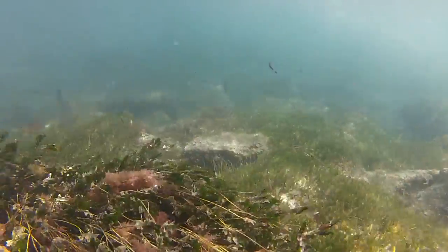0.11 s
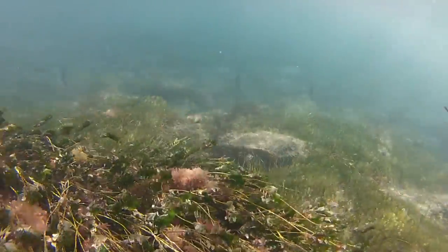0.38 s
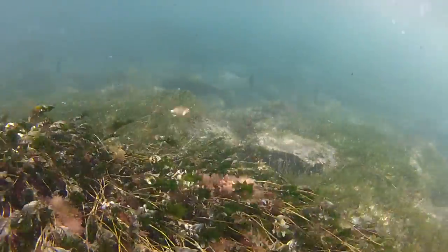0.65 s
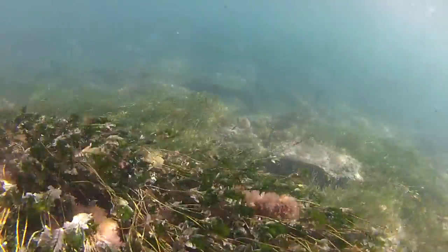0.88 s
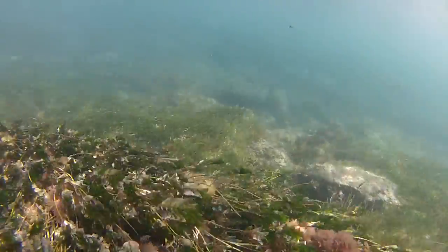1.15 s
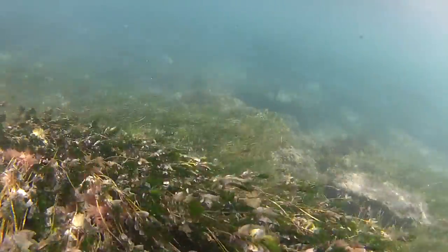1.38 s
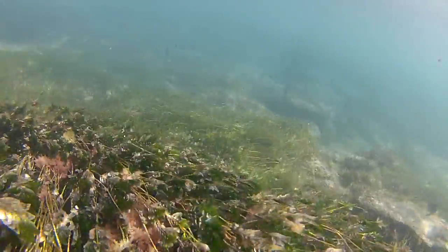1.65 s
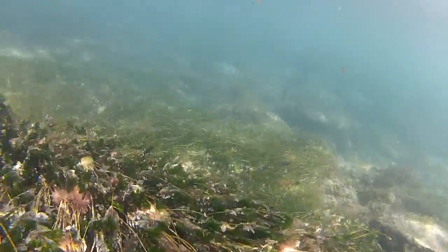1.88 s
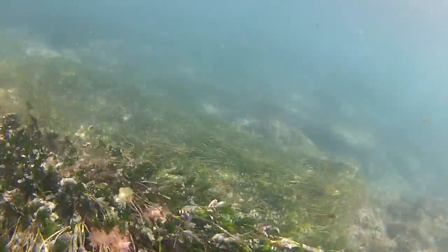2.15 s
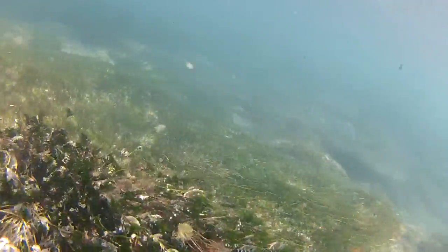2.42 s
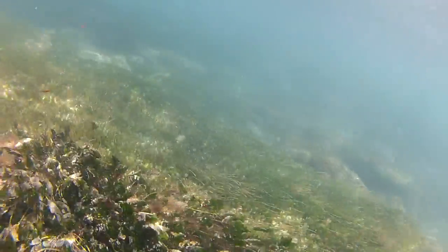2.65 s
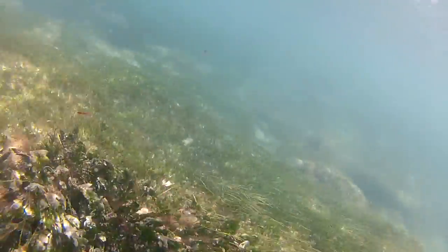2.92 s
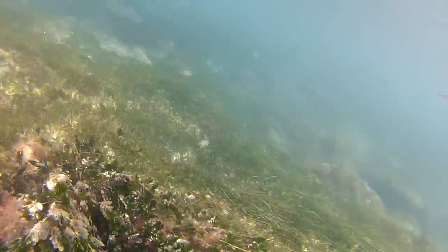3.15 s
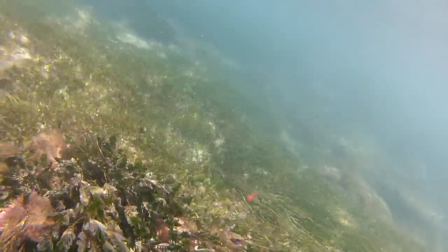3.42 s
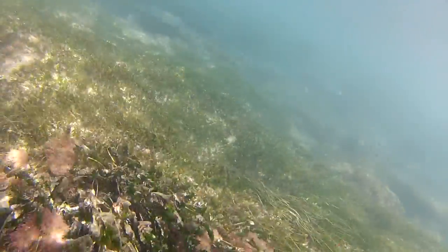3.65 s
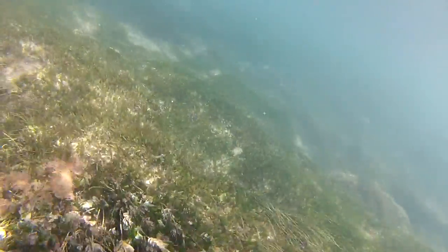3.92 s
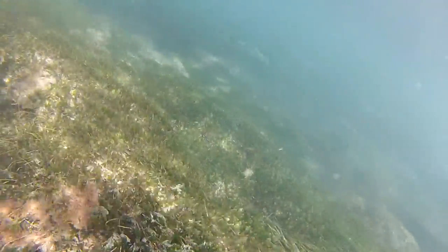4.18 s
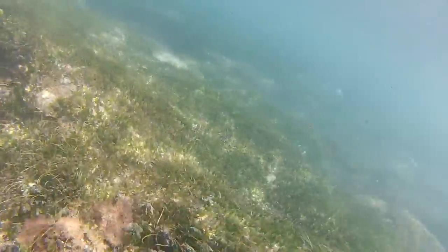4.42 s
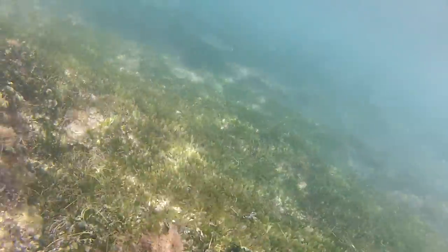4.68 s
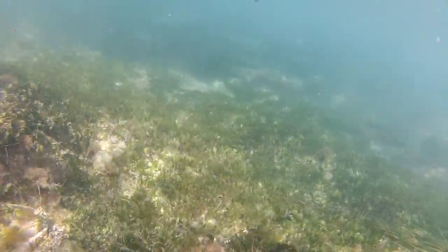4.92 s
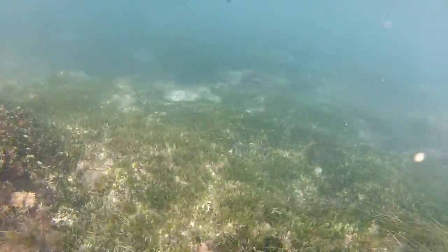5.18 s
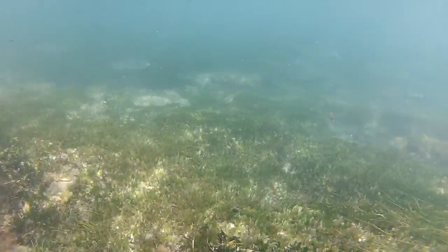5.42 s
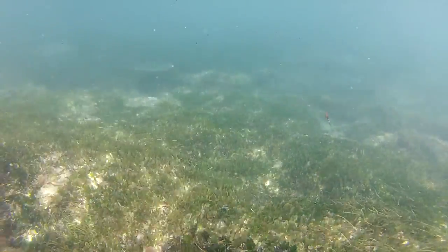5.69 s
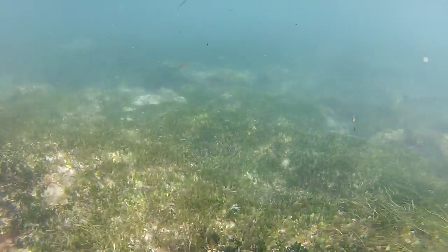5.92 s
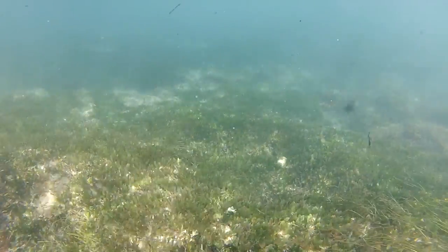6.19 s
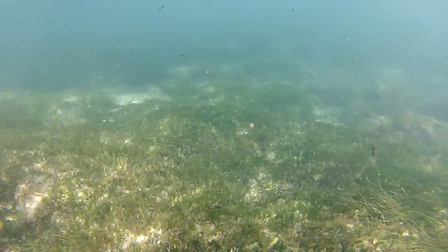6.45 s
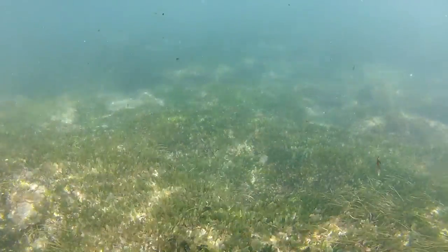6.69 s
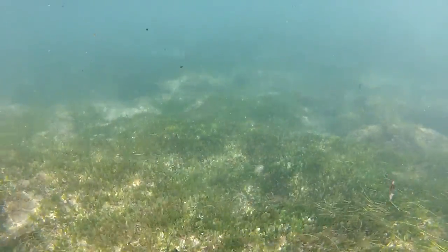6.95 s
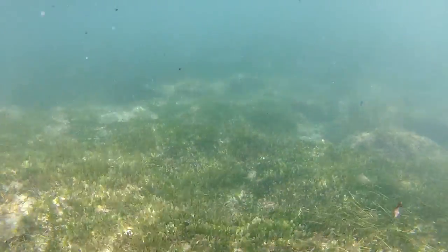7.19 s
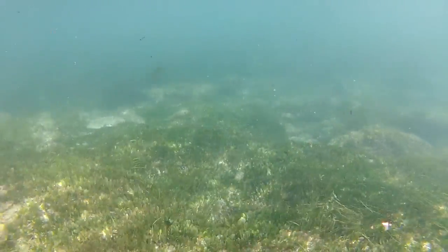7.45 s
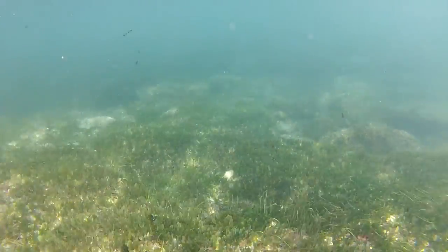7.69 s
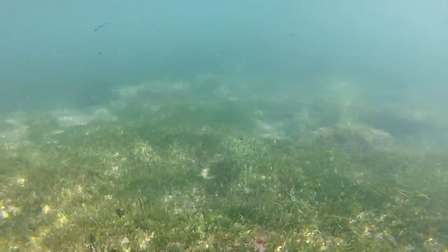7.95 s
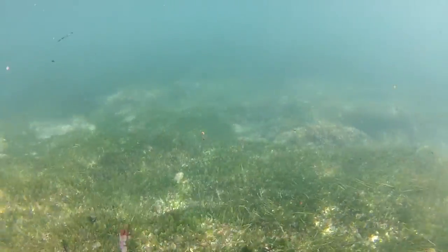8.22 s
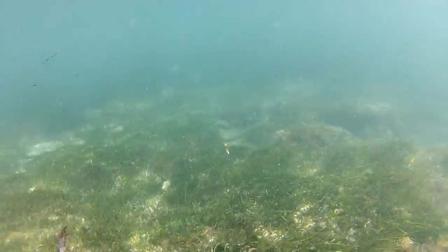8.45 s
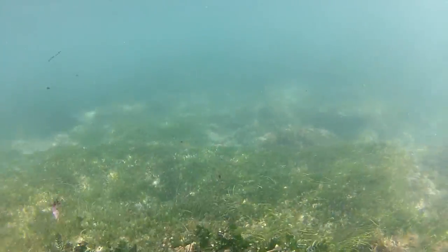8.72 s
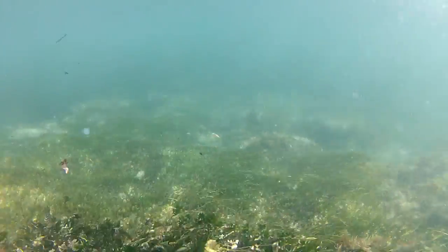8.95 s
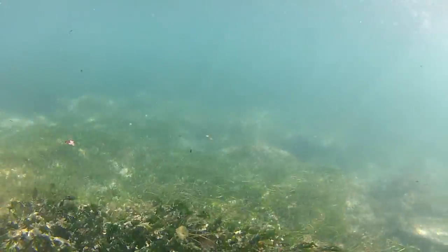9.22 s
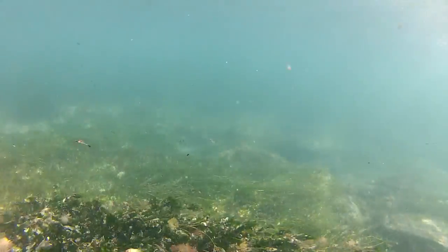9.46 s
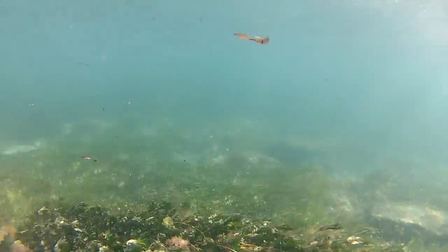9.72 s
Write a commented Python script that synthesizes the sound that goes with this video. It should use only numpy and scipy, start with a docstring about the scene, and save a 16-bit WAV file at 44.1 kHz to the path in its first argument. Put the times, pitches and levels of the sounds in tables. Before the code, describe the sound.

Under water, a loose plastic cover knocks and scrapes irregularly on a hollow camera housing, over low muffled water rumble and faint hiss.

```python
"""Knocks of a loose lens cover on a lanyard, under water, ring the damped modes of a plastic camera housing.
The cover also drags: random stick and slip drives the same modes, with squeaks, ticks and light bounces.
Behind it the water surges low, as slow-varying filtered noise, with a faint steady hiss.
The sealed-in microphone is sampled slowly and each value is held, which mirrors the sound into the treble."""
import sys
import numpy as np
from scipy import signal
from scipy.fft import rfft, irfft, next_fast_len
from scipy.io import wavfile
from scipy.ndimage import uniform_filter1d

SR = 44100
rng = np.random.default_rng(int(sys.argv[2]) if len(sys.argv) > 2 else 0)


def generate_wav(sig):
    """Save sig (samples, or channels by samples) to the path in sys.argv[1] as 16-bit PCM at SR."""
    pcm = np.round(np.clip(np.atleast_2d(sig).T, -1, 1) * 32767).astype(np.int16)
    wavfile.write(sys.argv[1], SR, pcm)


def gain_from_db(level_db):
    """Convert decibel levels to linear amplitude factors (20 dB per decade)."""
    decades = np.asarray(level_db, float) / 20
    return 10 ** decades


N = 434385

# water pushing the housing: start_s, level_db (rms of the rumble)
WATER_SURGE = [(0, -31.5), (1.12, -29.5), (1.302, -44.5), (1.85, -33), (2.199, -43.5), (4.399, -47.5),
               (5.698, -44), (6.101, -49.5), (9.85, -42)]
# spectral shape of the hiss: frequency_hz, relative_level_db
HISS_SHAPE = [(60, -12.5), (280, -12), (900, -28.5), (1900, -33.5), (5500, -41)]
# housing modes, nominal values for the damped ring of an ordinary blow: frequency_hz, relative_level_db, t60_s
LOW_MODES = [(61.5, -15.5, 0.073), (91, -5.5, 0.093), (147.3, -1, 0.085), (185.8, -0.5, 0.16),
             (283, 0, 0.038)]
MIDDLE_MODES = [(364.8, -2, 0.059), (425.4, -0.5, 0.042), (510.3, 5, 0.042), (657, 0, 0.069),
                (725.5, -0.5, 0.068), (830, -1, 0.049)]
HIGH_MODES = [(1070, 10, 0.026), (1403, 3, 0.033), (1774, 9, 0.016), (1982, 5.5, 0.023), (2253, -3, 0.043),
              (2446, -3, 0.02), (2800, -14, 0.016), (3020, -14, 0.021), (3460, -9, 0.022),
              (3625, -17.5, 0.042), (3770, -22.5, 0.013), (4750, -28, 0.028)]
# light bounces of the cover: start_s, peak_db
LIGHT_BOUNCES = [(5.41, -48), (6.38, -56), (6.451, -55), (8.741, -39)]
# clearest squeaks: centre_s, peak_db, pitch_hz
CLEAR_SQUEAKS = [(2.811, -41, 2160), (3.099, -42, 2060), (4.41, -51, 3570), (4.462, -44, 2020)]
# scrapes along the housing, before the mid-stroke push: start_s, end_s, start_level_db, end_level_db
DRAG_STROKES = [(0, 0.22, -38, -33.5), (0.303, 0.431, -27, -25.5), (0.543, 0.603, -33, -34),
                (0.758, 0.926, -34.5, -28.5), (1.468, 1.66, -42, -28.5), (1.64, 1.826, -27.5, -21.5),
                (1.863, 1.939, -15, -22), (2.057, 2.36, -41.5, -35), (2.372, 2.474, -21.5, -40),
                (2.48, 2.605, -38.5, -36.5), (2.61, 2.74, -26, -26), (2.841, 2.941, -24.5, -17.5),
                (2.995, 3.11, -25.5, -41.5), (3.195, 3.348, -47, -26.5), (3.451, 3.495, -31.5, -38),
                (3.543, 3.63, -24.5, -26), (3.638, 3.758, -19.5, -27), (3.957, 4.15, -31.5, -41),
                (4.161, 4.336, -27, -44.5), (4.322, 4.516, -50, -50), (4.521, 4.584, -38.5, -42),
                (4.654, 4.75, -34, -29), (4.774, 4.93, -22.5, -22), (5.594, 5.75, -33.5, -37),
                (5.74, 5.812, -28.5, -21.5), (5.963, 6.19, -40, -40), (6.123, 6.39, -37.5, -50.5),
                (6.408, 6.588, -49, -57), (7.26, 7.3, -28, -43), (7.32, 7.4, -20.5, -34.5),
                (7.46, 7.603, -32, -45.5), (7.577, 7.8, -51, -41.5), (7.842, 7.979, -39, -41.5),
                (8.729, 8.981, -39, -57), (9.105, 9.2, -54.5, -61.5), (9.41, 9.505, -33.5, -38.5),
                (9.599, 9.83, -36, -35.5)]
# how the cover bears on the housing:
# time_s, low_mode_weight_db, high_mode_hardness_db, spot_pitch_hz (favoured by the contact spot)
CONTACT_PATH = [(0.16, 7.5, -9, 500), (0.24, -3.5, -26, 460), (0.568, 9, -22.5, 430),
                (1.631, -10.5, -18, 452), (1.8, -5, -17, 640), (1.9, -4.5, -26, 644),
                (2.339, 1, -11.5, 550), (2.39, 0.5, -17.5, 674), (2.6, -12.5, -19, 593),
                (2.75, -5, -21, 583), (3.05, -5, -17.5, 577), (3.701, -4, -17, 573), (4.25, 1, -18, 550),
                (4.45, -12, -6.5, 550), (4.897, -3, -21.5, 571), (5.549, -5.5, -12.5, 500),
                (5.81, 4.5, -15, 520), (6.17, 5.5, -8, 630), (6.33, 1.5, -11.5, 643), (7.3, 8, -16, 483),
                (7.509, 2, -13, 587), (9.85, -2.5, -10.5, 513)]
# knocks: start_s, middle_mode_peak_db, low_mode_weight_db, high_mode_hardness_db, spot_pitch_hz
COVER_KNOCKS = [(0.045, -1, -3, -4.5, 430), (0.191, -6.5, -5, -3, 447), (0.235, -17.5, 1.5, -14, 470),
                (0.277, -15, -3, -13, 450), (0.291, -20, 3, -4.5, 455), (0.324, -31, 5, -3, 448),
                (0.362, -12.5, -1.5, -4, 460), (0.384, -19, 6, -13, 450), (0.406, -26.5, -12, 0, 440),
                (0.481, -24.5, 4, -12.5, 570), (0.514, -20.5, -1, -18, 430), (0.541, -22, -18, -4.5, 456),
                (0.567, -16, -23, -12.5, 460), (0.579, -19.5, 8, -6, 407), (0.716, -23, 2.5, -21, 441),
                (0.779, -19.5, 0, -18, 427), (0.818, -10, -4, -17, 520), (0.871, -13.5, -7.5, -16, 455),
                (0.96, -19, -2, -15.5, 445), (1.024, -17.5, 2.5, -23, 445), (1.066, -18, 1.5, -16.5, 467),
                (1.674, -15, -12.5, -8, 463), (1.806, -4, -22.5, 3.5, 535),
                (1.841, -14.5, -11.5, -5.5, 520), (1.87, -7.5, -13, -4.5, 710), (2.372, -12, -34, -37, 593),
                (2.734, -6, -12, -1.5, 660), (2.829, -17.5, -18.5, -17, 570), (2.856, -3, -17, -7, 522),
                (2.881, -9.5, -36.5, -4, 530), (3.445, -10.5, -8, -13, 474), (3.541, -5.5, -7, 0, 796),
                (3.574, -11, -14.5, -6, 520), (4.171, -11, -8, -13, 506), (4.784, -3, -29, -8, 538),
                (4.84, -6, -11, -9.5, 534), (5.026, -46.5, -7.5, 17.5, 594), (5.238, -10, 2.5, -13, 503),
                (5.337, -10, -2, -13, 506), (5.353, -17, -10.5, -10.5, 523), (5.508, -15.5, -5, -12.5, 506),
                (5.553, -14.5, -9, -12, 505), (5.571, -17, -12, -15.5, 510),
                (5.588, -16.5, -13.5, -13, 511), (5.61, -1, -12.5, -2, 720), (5.666, 3.5, -19, -6, 707),
                (5.746, -15, -4, -6, 503), (5.784, -15.5, -19, -3.5, 520), (5.802, -12.5, -3, 0, 533),
                (5.816, -11.5, -27, -1.5, 540), (6.417, -32.5, -33, -28, 590), (6.548, -31, -27, -48, 533),
                (6.585, -32.5, -9, -21, 536), (7.189, -10.5, -11.5, -11.5, 471),
                (7.259, -11, -34.5, -4, 506), (7.3, -13, 2, -9, 494), (7.317, -9, 5, -1.5, 342),
                (7.339, -14, 0.5, -5, 490), (7.358, -24.5, 20, -14.5, 504), (7.451, -23, 3.5, -17, 500),
                (7.959, -21.5, -15.5, -19.5, 529), (8.673, 5.5, -21, -2.5, 411),
                (8.721, -12, -21, -7.5, 424), (8.803, -17, -22, -8.5, 413), (9.457, -22.5, -25, 0, 650)]


def evened(x):
    """Normalization: scales a signal to rms 1."""
    return x / np.sqrt(np.mean(x ** 2) + 1e-20)


def add(mix, start_s, sound):
    """Superposition: adds a sound to the mix from its start time."""
    part = mix[round(start_s * SR):][:len(sound)]
    part += sound[:len(part)]


def coloured(gain):
    """Spectral shaping: white noise weighted by a gain over Hz, at rms 1."""
    size = next_fast_len(N)
    hz = np.fft.rfftfreq(size, 1 / SR)
    spectrum = rfft(rng.standard_normal(size)) * gain(hz + 1)  # +1 avoids the log of zero
    return evened(irfft(spectrum)[:N])


def water():
    """Broadband flow noise: a low rumble with a surging level over a faint steady hiss."""
    rumble = coloured(lambda hz: (hz / 14) ** 2 / (1 + (hz / 14) ** 2) / (1 + (hz / 35) ** 4.4))
    shape_hz, shape_db = np.transpose(HISS_SHAPE)
    hiss = coloured(lambda hz: gain_from_db(np.interp(np.log(hz), np.log(shape_hz), shape_db)))
    surge_db = np.interp(np.arange(N) / SR, *np.transpose(WATER_SURGE))
    return gain_from_db(surge_db) * rumble + gain_from_db(-56) * hiss


def near_db(hz, spot_hz, octaves=0.098, depth_db=13):
    """Point of drive: middle modes near the pitch of the contact spot are driven hardest."""
    return depth_db * np.exp(-.5 * (np.log2(hz / spot_hz) / octaves) ** 2)


def edge_db(hz, spot_hz):
    """Stiffness: low-pitched rim spots drive the modes above and below those of the flat faces."""
    octaves = np.log2(np.minimum(hz, 3600) / 2650)
    rim = np.log2(np.clip(520 / spot_hz, 1, 1.3))
    return np.maximum(90 * octaves, -22 * octaves) * rim


def struck(modes, t, chance, lean_db, length, scatter_db=3):
    """Impulse response: a blow sets off decaying modes, damped by the cover over a faint free ring; peak 1."""
    hz, db, t60 = np.transpose(modes)[:, :, None]
    count = len(modes)
    hz = hz * (1 + 0.015 * chance[-count:, None])  # the cover's load detunes each mode a little
    gain = gain_from_db(db + lean_db(hz) + scatter_db * chance[:count, None])
    # random polarity for each mode, so that the modes do not line up into one click
    gain = gain * np.sign(chance[::-1][:count, None])
    rise = (1 - np.exp(-t * hz / 0.41)) ** 2  # a mode needs about a cycle to build up
    damped = gain_from_db(-60 * t / (length * t60))
    free = gain_from_db(-27.5 - 60 * t / (2.1 * t60))
    ring = (gain * rise * (damped + free) * np.sin(2 * np.pi * hz * t)).sum(0)
    return ring / abs(ring).max()


def ticks():
    """Sparse random excitation: scattered faint ticks of grit on the housing briefly ring its modes."""
    t, modes = np.arange(SR // 20) / SR, MIDDLE_MODES[:3] + HIGH_MODES[2:]
    clicks = gain_from_db(2.5 * rng.exponential(1, N)) * (rng.random(N) < 26 / SR)  # about 26 a second
    chance = rng.standard_normal(len(MIDDLE_MODES + HIGH_MODES))
    tick = struck(modes, t, chance, lambda hz: 3 * np.log2(hz / 1000), 0.16)
    return gain_from_db(-57) * signal.oaconvolve(clicks, tick)[:N]


def bounces():
    """Selective excitation: light bounces ring only three of the upper modes."""
    t, out = np.arange(SR // 20) / SR, np.zeros(N)
    chances = rng.standard_normal((len(LIGHT_BOUNCES), len(HIGH_MODES)))
    for (start_s, db), chance in zip(LIGHT_BOUNCES, chances):
        add(out, start_s, gain_from_db(db) * struck(HIGH_MODES[-5:-2], t, chance, lambda hz: 0, 0.45))
    return out


def squeak(hz, length_s=0.01):
    """Windowed tone: a short sine of one pitch under a soft sine-squared envelope."""
    t = np.arange(0, length_s, 1 / SR)
    return np.sin(np.pi * t / length_s) ** 2 * np.sin(2 * np.pi * hz * t)


def squeaks():
    """Tonal friction: the clearest squeaks of the cover, each a blip of one pitch."""
    out = np.zeros(N)
    for centre_s, db, hz in CLEAR_SQUEAKS:
        add(out, centre_s - 0.005, gain_from_db(db) * squeak(hz))
    return out


def scrape_db():
    """Contact force: the cover lands, slides with changing force and lifts off, which sets the level."""
    arch_db, rest_db = 2, -69.5  # extra push in mid stroke; the cover barely touching
    land_db_per_s, lift_db_per_s = 1501.5, 352.5
    t = np.arange(0, N / SR + .01, .002)
    start, end, first_db, last_db = np.transpose(DRAG_STROKES)[:, :, None]
    way = np.clip((t - start) / (end - start), 0, 1)
    db = first_db + (last_db - first_db) * way + arch_db * np.sin(np.pi * way)
    db = db - land_db_per_s * np.maximum(start - t, 0) - lift_db_per_s * np.maximum(t - end, 0)
    power = (gain_from_db(db) ** 2).sum(0) + gain_from_db(rest_db) ** 2
    return np.interp(np.arange(N) / SR, t, 10 * np.log10(power))


def rubbed(modes, level, slips, lean_db, widen=1.0, wander_db=3, order=1):
    """Resonance under random drive: slips feed each mode, and modes come and go as the contact wanders."""
    step = 512  # samples between values of the wandering
    count = N // step + 2
    hz, db, t60 = np.transpose(modes)[:, :, None]
    wander = uniform_filter1d(rng.standard_normal((len(modes), count)), 7, axis=1)
    share = gain_from_db(db + lean_db(hz, np.arange(count) * step / SR) + wander_db * evened(wander))
    share = share * t60 ** 0.51  # long-ringing modes gather more of the rubbing
    share /= np.sqrt((share ** 2).sum(0))
    out = np.zeros(N)
    for f, decay, gain in zip(hz[:, 0], t60[:, 0], share):
        r, turn = gain_from_db(-60 * widen / decay / SR), 2 * np.pi * f / SR
        poles = [1, -2 * r * np.cos(turn), r * r]
        gain = np.interp(np.arange(N) / step, np.arange(count), gain)
        drive = level * slips * gain * rng.standard_normal(N)
        unit = np.sin(turn) * np.sqrt(4 * (1 - r))  # rms 1 for white drive
        ring = signal.lfilter([unit], poles, drive)
        for _ in range(order - 1):  # steeper flanks leave the gaps between modes dark
            ring = signal.lfilter([np.sqrt(8) * np.sin(turn) * (1 - r)], poles, ring)
        out += ring
    return out


def drag():
    """Stick-slip friction: a firm stroke rubs smoothly, while a light touch skips and ticks."""
    t = np.arange(N) / SR
    s, weight_db, hard_db, spot_hz = np.transpose(CONTACT_PATH)
    db = scrape_db()
    hard_level_db = db + np.interp(t, s, hard_db)

    # sudden catches, about 150 a second, each fading over some 3 ms
    catches = gain_from_db(50.0 * np.minimum(rng.exponential(1, N), 2)) * (rng.random(N) < 150 / SR)
    catches = evened(signal.lfilter([1], [1, -np.exp(-1 / (0.0033 * SR))], catches))
    skipping = np.clip((-29.0 - db) / 35, .15, .85)
    slips = np.sqrt(1 - skipping + skipping * catches ** 2)

    def low_lean(hz, at):
        """Soft contact favours the lowest modes."""
        return 0.6 * (np.interp(at, s, hard_db) + 14.5) * np.log2(np.minimum(hz, 190) / 150)

    def middle_lean(hz, at):
        """The contact spot favours the modes near its pitch."""
        return near_db(hz, np.interp(at, s, spot_hz), 0.14, 11)

    def high_lean(hz, at):
        """The flat faces rasp brighter."""
        db_per_octave = 2.0 + 7.3 * np.log2(np.maximum(np.interp(at, s, spot_hz) / 520, 1))
        return db_per_octave * np.log2(np.minimum(hz, 2500) / 2000)

    # light touches shake the low modes more than the faces
    low_db = db + np.interp(t, s, weight_db) - 0.19 * (np.maximum(db, -50) + 32.5)
    low = rubbed(LOW_MODES, gain_from_db(low_db), slips, low_lean, wander_db=7.0)
    middle = rubbed(MIDDLE_MODES, gain_from_db(db), slips, middle_lean, widen=1.5, order=2)
    high = rubbed(HIGH_MODES, gain_from_db(hard_level_db), slips, high_lean, widen=2.2, wander_db=5.5, order=2)

    for hz, mode_db, _ in HIGH_MODES[2:-2]:  # a light touch squeaks now and then on one high mode
        nicks = (rng.random(N) < 10 / SR) * gain_from_db(1.0 * rng.exponential(1, N))  # about 10 a second
        nicks = nicks * skipping * gain_from_db(hard_level_db + 1.2 * mode_db + 1.5)
        high = high + signal.oaconvolve(nicks, squeak(hz))[:N]

    # firm strokes add a fine wide grain
    band = signal.butter(4, [1100, 3900], "band", fs=SR, output="sos")
    rasp = signal.sosfilt(band, slips * rng.standard_normal(N))
    return low + middle + high + (1 - skipping) * gain_from_db(hard_level_db - 3.5) * rasp


def knocks():
    """Modal impact: each blow rings three families of modes and opens with a short crack of noise."""
    # scale of the damped ring's length; blows over press_db press the cover on and shorten it
    usual_length, pressed_length, press_db = 1, 0.3, -1.5
    t, out = np.arange(SR // 4) / SR, np.zeros(N)
    chances = rng.standard_normal((len(COVER_KNOCKS), 3, len(HIGH_MODES)))
    grit = rng.standard_normal((len(COVER_KNOCKS), len(t))) * gain_from_db(-60 * t / 0.016)
    band = signal.butter(2, [1500, 4100], "band", fs=SR, output="sos")
    cracks = signal.sosfilt(band, signal.sosfilt(band, grit))
    for (start_s, db, weight_db, hard_db, spot_hz), chance, crack in zip(COVER_KNOCKS, chances, cracks):
        pressed = np.clip((db - press_db) / 0.62, 0, 1)
        length = usual_length + (pressed_length - usual_length) * pressed
        # soft blows shove the whole housing and favour its lowest modes
        low_slope_db = 5.2 * min(hard_db + 13, 0)
        low = struck(LOW_MODES, t, chance[0], lambda hz: low_slope_db * np.log2(hz / 150), length)
        # the flat faces ring longer, unless pressed
        face_length = length * max(spot_hz / 500, 1) ** (0.54 if db < press_db else -1.3)
        middle = struck(MIDDLE_MODES, t, chance[1],
                        lambda hz: near_db(hz, spot_hz) + 2 * edge_db(hz, spot_hz), face_length)
        high = struck(HIGH_MODES, t, chance[2], lambda hz: edge_db(hz, spot_hz), 1.1 * length)
        high = high + gain_from_db(-9.0 + .5 * db) * crack / abs(crack).max()  # strong blows crack more
        add(out, start_s, gain_from_db(db) * (middle + gain_from_db(weight_db) * low + gain_from_db(hard_db) * high))
    # the wet contact blunts the very top
    return signal.sosfilt(signal.butter(4, 4700, fs=SR, output="sos"), out)


def scene():
    """Superposition: water, ticks, bounces, squeaks, dragging and knocks at one microphone."""
    return (water() + ticks() + bounces() + squeaks() + drag() + knocks())[None]


def top_cut(x):
    """Nothing passes above the cut-off."""
    return signal.sosfilt(signal.butter(12, 15910, fs=SR, output="sos"), x)


def record(dry):
    """Zero-order hold: slow samples, each repeated, leave mirror images of the sound in the treble."""
    slow = np.clip(signal.resample_poly(dry, 40, 147, axis=1), -1, 1)  # 12000 samples a second, clipped
    held = np.repeat(slow, 4, axis=1)  # 48000 a second
    held = signal.resample_poly(held, 147, 160, axis=1)[:, :N]  # back to SR
    held = np.pad(held, [(0, 0), (0, N - held.shape[1])])
    band_limit = signal.firwin(101, 15300, window=("kaiser", 3.5), fs=SR)  # low-pass edge in Hz
    finished = np.clip(signal.oaconvolve(held, band_limit[None], "same"), -1, 1)
    return top_cut(finished)


dry = scene()
out = record(dry)
generate_wav(out)
```